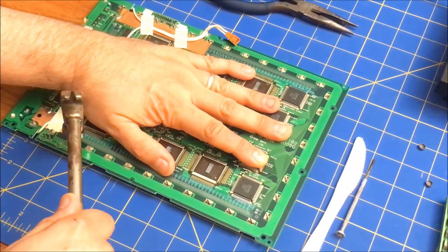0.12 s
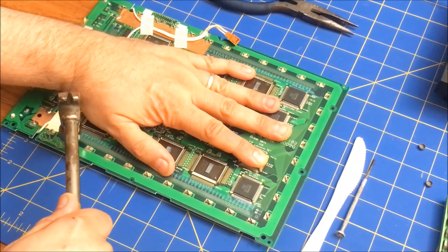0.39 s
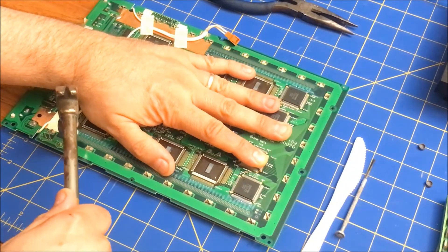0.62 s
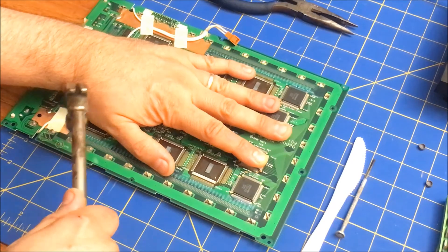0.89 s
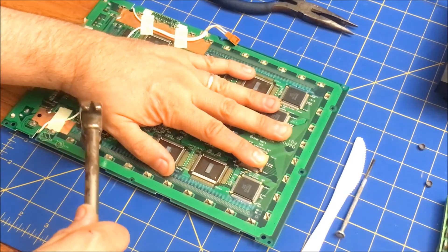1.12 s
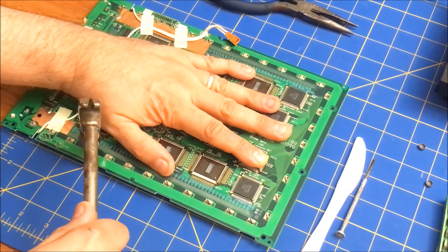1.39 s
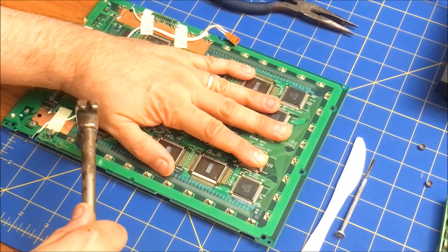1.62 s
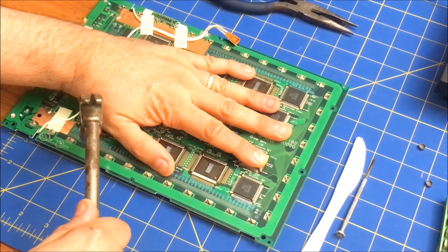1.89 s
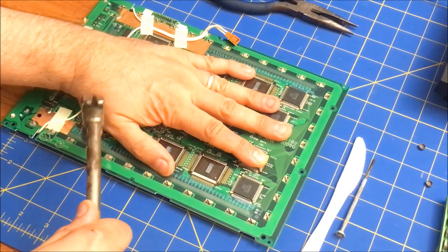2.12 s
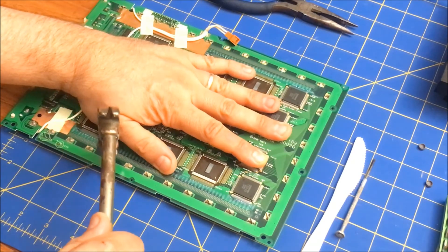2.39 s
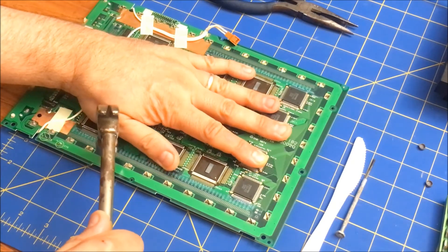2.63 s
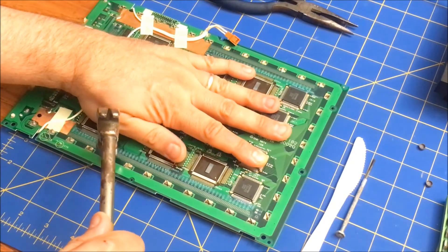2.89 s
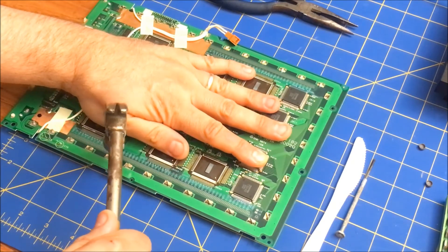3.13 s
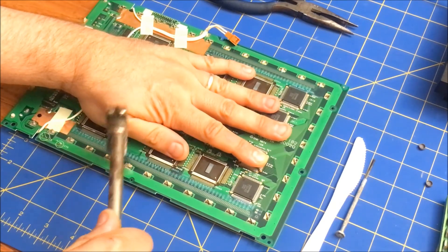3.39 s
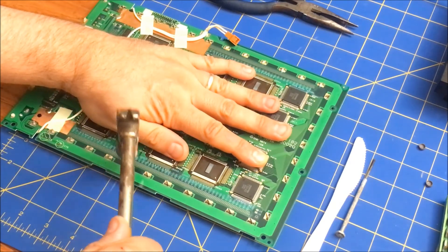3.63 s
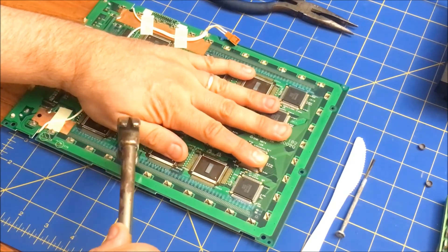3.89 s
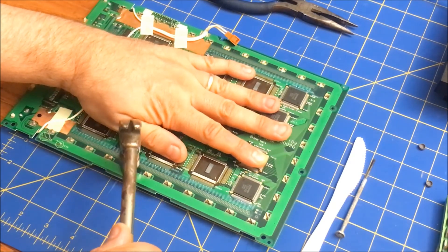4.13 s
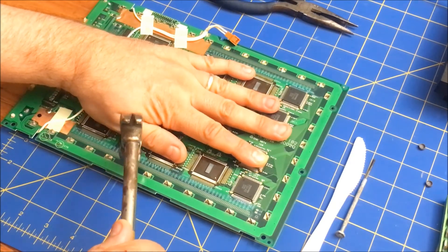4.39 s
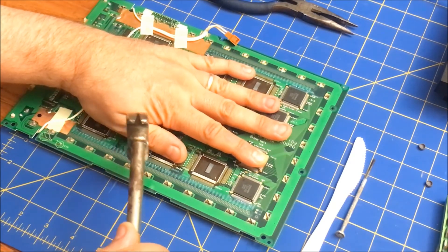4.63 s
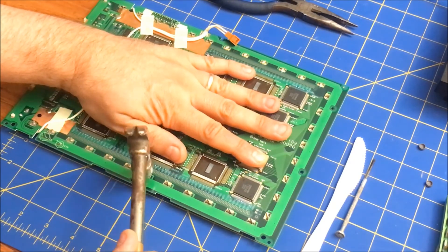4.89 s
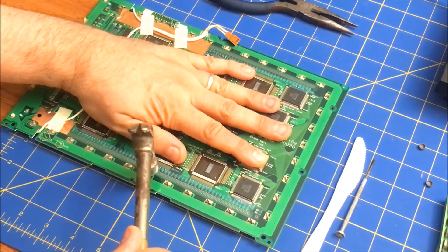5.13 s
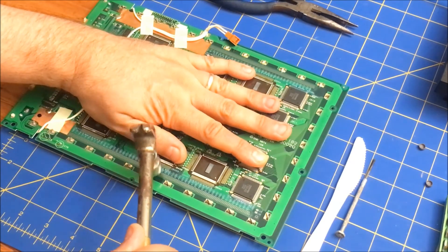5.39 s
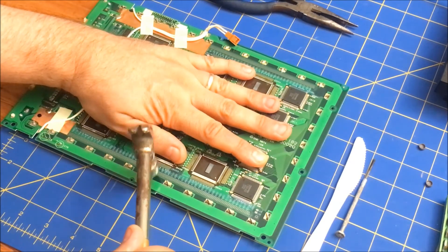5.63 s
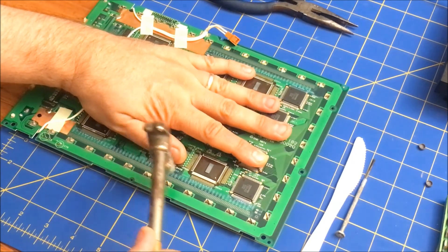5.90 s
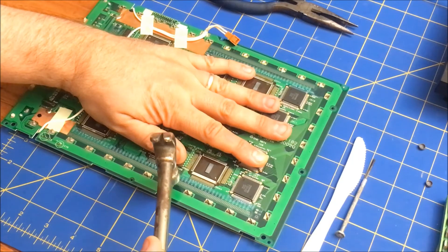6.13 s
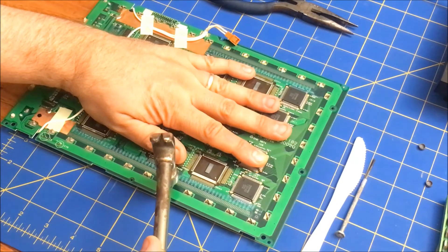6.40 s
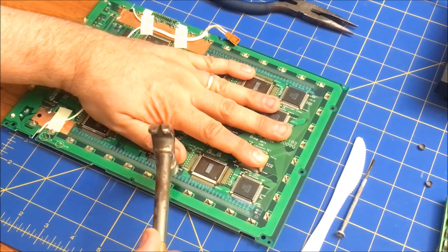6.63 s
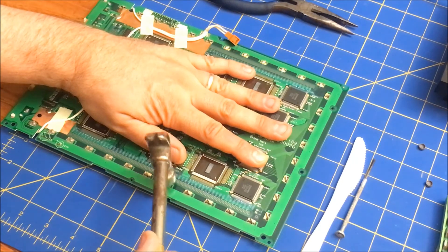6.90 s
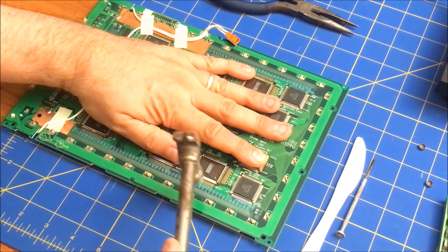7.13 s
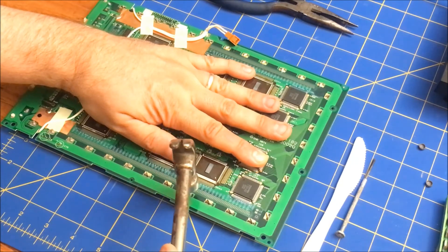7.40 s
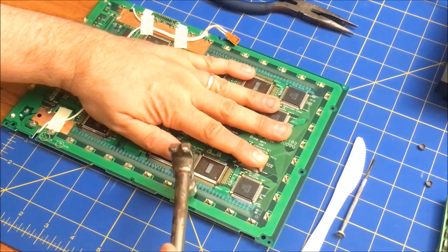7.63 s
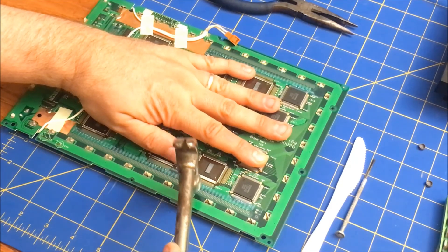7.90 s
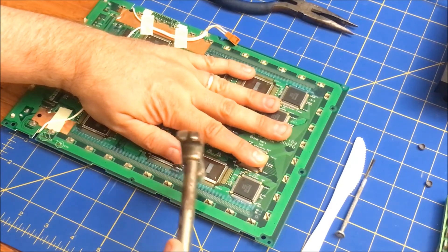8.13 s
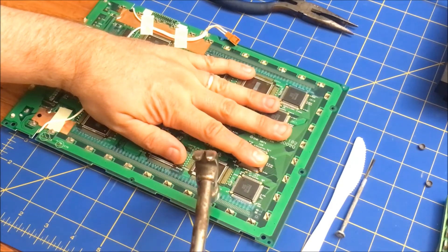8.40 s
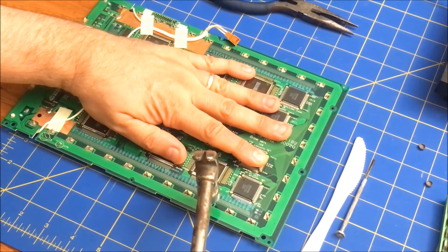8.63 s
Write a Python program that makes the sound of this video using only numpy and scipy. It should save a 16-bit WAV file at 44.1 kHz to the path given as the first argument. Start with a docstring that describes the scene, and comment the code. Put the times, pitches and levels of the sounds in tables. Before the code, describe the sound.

A tail of an earlier blow is already fading, then firm double taps repeat every second or so until just after eight seconds. Metal ticks on a stiff board, the bench thuds beneath, and some hits rattle or bounce. The microphone is close and the hardest peaks distort slightly. The small room rings briefly; faint birdlike whistles surface in the quiet gaps.

```python
"""Tapping tabs on a circuit board

On a workbench in a small room, a small steel tool taps metal tabs on a board held down by hand,
two blows at a time, often with a rebound. A blow is a bright tick of steel, a short crack of the board
and a low knock of the bench, each a set of dying sines; nearby surfaces and noise-built room tails answer.
Behind lie shaped noise (rumble and hiss), hiss that starts after some blows, and far whistling made of
blurred gliding tones, probably a bird. The hardest peaks overload the microphone input."""
import sys
import numpy as np
from scipy import signal
from scipy.fft import rfft, irfft
from scipy.io import wavfile
from scipy.ndimage import uniform_filter1d

SR = 44100
rng = np.random.default_rng(int(sys.argv[2]) if len(sys.argv) > 2 else 0)


def magnitude_from_level(level_db):
    """Linear magnitude for a level in decibels (20 dB per decade)."""
    exponent = np.asarray(level_db, float) / 20
    return 10 ** exponent


def wrap_up_sound(samples):
    """Save the sound to the file named by the first command line argument, as 16-bit audio."""
    columns = np.atleast_2d(samples).T
    # keep every value between -1 and 1, then stretch to whole-number steps
    tamed = np.clip(columns, -1, 1)
    steps = np.round(tamed * 32767).astype(np.int16)
    wavfile.write(sys.argv[1], SR, steps)


N = 386316  # length in samples
LEAD = SR // 2  # samples of run-up, for a blow already ringing out at the start


def evened(x):
    """Scales to rms 1."""
    return x / np.sqrt(np.mean(x ** 2) + 1e-20)


def read(points, hz):
    """Reads a table along log frequency."""
    table_hz, value = np.transpose(points)
    return np.interp(np.log(hz + 1), np.log(table_hz + 1), value)


def add(mix, at, sound):
    """Mixes a sound in from sample at, cut off at the end of the mix."""
    part = mix[at:at + len(sound)]
    part += sound[:len(part)]


def ring(modes, seconds):
    """Dying sines, one per mode; neighbouring modes start in opposite directions."""
    t = np.arange(round(seconds * SR)) / SR
    return sum((-1) ** k * magnitude_from_level(db - 60 * t / t60) * np.sin(2 * np.pi * hz * t)
               for k, (hz, db, t60) in enumerate(modes))


def coloured_noise(spectrum):
    """Steady noise of rms 1 with the given spectrum."""
    hz = np.fft.rfftfreq(N, 1 / SR)
    shaped = rfft(rng.standard_normal(N)) * magnitude_from_level(read(spectrum, hz))
    return evened(irfft(shaped, N))


# steady background at the microphone, relative spectrum: (pitch_hz, level_db)
FLOOR_SPECTRUM = [(15, -20), (25, -4), (97, 5.5), (373, -10), (427, -10), (545, -14.5), (624, -19.5),
                  (988, -22.5), (1070, -22.5), (1160, -23.5), (2050, -21), (2840, -26), (5280, -25),
                  (16000, -20.5)]


def floor():
    """Faint rumble and hiss: steady noise, strongest near 100 Hz."""
    return magnitude_from_level(-67.5) * coloured_noise(FLOOR_SPECTRUM)


# far whistled notes: (start_s, length_s, first_pitch_hz, last_pitch_hz, level_db)
WHISTLED_NOTES = [(.25, .07, 2810, 3150, -77), (0.301, 0.1, 3180, 3160, -68.5),
                  (0.378, 0.25, 2470, 2350, -77.5), (2.469, .11, 3480, 3450, -87),
                  (2.53, .08, 2900, 2810, -73.5), (2.595, 0.081, 2270, 2150, -75),
                  (2.681, .12, 2370, 2280, -72.5), (2.99, 0.063, 3020, 2990, -75.5),
                  (3.022, 0.11, 3330, 3370, -75.5), (5.73, 0.075, 2850, 2810, -71),
                  (6.177, .1, 3010, 3010, -76), (6.186, 0.092, 3390, 3400, -81),
                  (6.25, 0.08, 2300, 2650, -81), (6.335, 0.084, 2820, 2750, -71.5),
                  (6.355, 0.046, 3100, 3100, -77), (8.65, 0.068, 3057, 3056, -80.5),
                  (8.686, 0.06, 2460, 2430, -78.5)]


def whistles():
    """Gliding notes blurred by distance: a tone with wandering strength and an echoing end."""
    width_hz, rise_s, t60_s = 140, 0.006, 0.16
    out, t = np.zeros(N), np.arange(SR // 2) / SR
    keep = np.exp(-np.pi * width_hz / SR)
    two_poles = np.convolve([1, -keep], [1, -keep])
    draws = rng.standard_normal((len(WHISTLED_NOTES), 2, len(t)))
    for (start, length, first_hz, last_hz, db), noise in zip(WHISTLED_NOTES, draws):
        turns = np.cumsum(np.interp(t, [0, length], [first_hz, last_hz])) / SR
        blur = signal.lfilter([1], two_poles, noise[0] + 1j * noise[1])
        tone = evened((blur * np.exp(2j * np.pi * turns)).real)
        level = np.minimum(t / rise_s, 1) * magnitude_from_level(db - 60 * np.maximum(t - length, 0) / t60_s)
        add(out, round(start * SR), level * tone)
    return out


# hiss that stands up after some blows: (start_s, level_db)
SWELLS = [(-.22, -47.5), (0.929, -46.5), (4.643, -50.5)]
# its relative spectrum: (pitch_hz, level_db)
SWELL_SPECTRUM = [(590, -20), (1000, -6.5), (1230, -1.5), (1520, -12), (3930, -6), (4680, -12.5),
                  (10200, -7.5), (16000, -11)]


def hiss_swells():
    """Wide noise that starts at once, sinks slowly, drops quickly and then stays on very faintly."""
    hold_s, drop_s = 0.395, 0.035
    sink_db, drop_db = -13.5, -27
    t, level = np.arange(N) / SR, np.zeros(N)
    for start, db in SWELLS:
        shape_db = np.interp(t - start, [0, hold_s, hold_s + drop_s], [0, sink_db, sink_db + drop_db])
        level += (t >= start) * magnitude_from_level(db + shape_db)
    return level * coloured_noise(SWELL_SPECTRUM)


# decay of the small room: (pitch_hz, t60_s)
ROOM_DECAY = [(45, 1), (100, 0.98), (180, 0.92), (300, 0.71), (700, .35), (1200, 0.41), (2000, 0.36),
              (5000, 0.37), (13500, 0.2)]
# relative colour of its tail: (pitch_hz, level_db)
ROOM_TONE = [(30, -20.5), (60, 0.5), (100, -2), (200, -4), (400, -4.5), (700, 4.5), (950, -1), (1200, 6.5),
             (1500, 3), (1850, -1), (2600, -5), (3300, -5), (3700, -3), (4200, -7), (5000, -8), (9000, -9),
             (16000, -12)]


def room(x):
    """Three dense noise tails, each band dying at its own speed, that trade places as time passes."""
    hz, t, z = signal.stft(rng.standard_normal((3, SR)), SR, nperseg=1024, noverlap=768)
    patches = uniform_filter1d(rng.standard_normal(z.shape), 9, 1)
    patches = evened(uniform_filter1d(patches, 4, 2))  # uneven walls
    decay_db = 60 * t / read(ROOM_DECAY, hz)[:, None]
    z *= magnitude_from_level(read(ROOM_TONE, hz)[:, None] - decay_db + 0.72 * patches)
    tails = signal.istft(z, SR, nperseg=1024, noverlap=768)[1]
    age = np.arange(tails.shape[1]) / SR
    tails *= np.clip(age / 0.004, 0, 1)  # the reflections build up
    tails *= 1 + 9.7 * np.exp(-age / 0.0016)  # the clutter on the bench scatters first and strongest
    tails /= np.sqrt((tails ** 2).sum() / 3)
    turn = 2 * np.pi * 0.3 * np.arange(len(x)) / SR  # 0.3 turns a second
    shares = np.sqrt(2 / 3) * np.cos(turn + 2 * np.pi / 3 * np.arange(3)[:, None])
    return signal.oaconvolve(x * shares, tails, axes=1)[:, :len(x)].sum(0)


# the nearest surfaces: (delay_s, level_db)
NEAR_SURFACES = [(.0068, -24), (0.013, -21.5), (0.019, -23.5)]


def echoes(x):
    """The nearest surfaces send delayed, weaker copies back."""
    return x + sum(magnitude_from_level(db) * np.roll(x, round(delay * SR)) for delay, db in NEAR_SURFACES)


# modes of the bench top, relative levels: (pitch_hz, level_db, t60_s)
BENCH_MODES = [(51.6, -24.5, 0.52), (66.5, -21.5, 0.19), (85.6, -23, 0.22), (107, -22, 0.72),
               (138.2, -31, 0.087), (140.7, -14, 0.19), (178.4, -26, 0.62), (226.8, -18.5, 0.14),
               (224, -27.5, 0.27), (242, -31, 0.15), (279.3, -13, 0.19), (356, -16, 0.11),
               (383.3, -17, .22), (414, -2, 0.026), (459, -23.5, 0.054), (532.4, -13.5, 0.18),
               (600.5, -11, 0.08), (693.3, -17.5, 0.29), (822, -27, 0.34)]
# drive of the upper modes, less and less as the tool works its way along the board: (time_s, level_db)
UPPER_DRIVE = [(0, 1), (4, -0.5), (6, -5), (8.701, -10)]


def bench(push):
    """The modes of the bench top ring after each push."""
    split_hz = 480
    upper = magnitude_from_level(np.interp((np.arange(len(push)) - LEAD) / SR, *np.transpose(UPPER_DRIVE)))
    low = ring([mode for mode in BENCH_MODES if mode[0] < split_hz], 1)
    high = ring([mode for mode in BENCH_MODES if mode[0] >= split_hz], 1)
    return (signal.oaconvolve(push, low) - signal.oaconvolve(push * upper, high))[:len(push)]


# modes of the board under the hand, relative levels: (pitch_hz, level_db, t60_s)
BOARD_MODES = [(1128, -19.5, 0.11), (1211, -18, 0.079), (1416, -4, 0.016), (1426, -18.5, 0.056),
               (1811, -0.5, 0.0078), (1693, -23, 0.09), (2350, -5.5, 0.0091), (3117, -5, 0.0083),
               (3746, -5, 0.0058), (4420, -12, 0.0044)]


def board_ring(spot_hz):
    """The board's short ring; the spot struck favours the modes near spot_hz, by 3.1 dB an octave."""
    ringing = ring([(hz, db - 3.1 * abs(np.log2(hz / spot_hz)), t60) for hz, db, t60 in BOARD_MODES], 0.14)
    return ringing / np.linalg.norm(ringing)


CLICK = np.array([1, 0, -1])  # the bare click of metal meeting metal
# modes of the tool and tab, levels against the click: (pitch_hz, level_db, t60_s)
STEEL_MODES = [(5860, -10.5, 0.0062), (6600, -22, 0.0014), (9700, -15.5, 0.0056), (13500, -18, 0.0087)]


def steel_ring():
    """The bare click and the very short ring of tool and tab."""
    ringing = ring(STEEL_MODES, 0.03)
    ringing[:3] += CLICK
    return ringing


def chatter(noise, fade_s):
    """The uneven force of a contact: a sharp first touch, then a few milliseconds of rattling."""
    force = noise ** 3 * np.exp(-np.arange(len(noise)) / (fade_s * SR))
    force[0] += 1.5
    return force / np.linalg.norm(force)


# every contact of the tool, rebounds included; the first is already ringing out at the start:
# (start_s, relative force_db, steel tick against force_db, pitch_hz favoured by the spot struck)
TOOL_CONTACTS = [(-.25, 6.5, -22, 1780), (0.598, 1.5, -19.5, 1895), (0.63, -10, -32, 2430),
                 (0.9199, 3, -19, 1903), (0.9573, -4, -24, 1450), (1.8399, 1, -11, 1831),
                 (1.8758, -6.5, -18, 1473), (2.1683, 0, -13.5, 1980), (2.1715, -7.5, -12.5, 4353),
                 (2.2012, -2, -22, 1470), (3.1077, 1.5, -16, 1898), (3.4733, 1, -14.5, 1866),
                 (3.4974, -8, -18.5, 1880), (4.2902, 1.5, -15.5, 1722), (4.6275, 3, -11.5, 1710),
                 (4.6751, -11, -16.5, 1774), (5.4892, -18, -8.5, 1800), (5.4919, -0.5, -20, 1885),
                 (5.831, 2.5, -14.5, 1783), (6.6489, -13, -16, 2006), (6.6513, -0.5, -14, 1500),
                 (7.01, 3, -16.5, 1650), (7.052, -7.5, -26, 1438), (7.7765, 1, -20.5, 2283),
                 (7.8027, -10, -25, 2420), (8.131, 3.5, -17.5, 2414), (8.1723, -9, -21, 1863)]


def blows():
    """Each contact rattles board and steel in its own way and pushes the bench through a soft mat."""
    sharp, push, bare = np.zeros((3, N + 2 * LEAD))
    shove = signal.windows.hann(round(0.0012 * SR))  # the mat softens what reaches the bench
    steel = steel_ring()
    board_lag_s, bench_lag_s = 0.0005, 0.00054  # both answer a moment after the tick
    draws = rng.standard_normal((len(TOOL_CONTACTS), 2, 400))
    for (s, force_db, bright_db, spot_hz), noise in zip(TOOL_CONTACTS, draws):
        at = LEAD + round(s * SR)
        tick_db = force_db + bright_db
        knock_db = 1.05 * force_db - 16  # the knock grows slightly faster than the force
        board = board_ring(spot_hz)
        crack = np.convolve(chatter(noise[0], 0.002), board)
        tick = np.convolve(chatter(noise[1], 0.0012), steel)
        add(sharp, at + round(board_lag_s * SR), magnitude_from_level(force_db + 10.5) * crack / np.linalg.norm(crack))
        add(sharp, at, magnitude_from_level(tick_db + 22.0) * tick / np.linalg.norm(tick))
        add(push, at + round(bench_lag_s * SR), magnitude_from_level(knock_db) * shove / shove.sum())
        # the blow as the walls receive it: rattle smoothed away, the ring of the board kept
        bare[at + len(shove) // 2] += magnitude_from_level(force_db + 5.5)
        add(bare, at, magnitude_from_level(force_db - 0.5) * board)
        add(bare, at, magnitude_from_level(tick_db + 4.0) * CLICK)
    return sharp, magnitude_from_level(11.0) * bench(push), bare + magnitude_from_level(31.5) * push


def scene():
    """Blows on the bench, their room, and the background, on one channel."""
    sharp, knock, bare = blows()
    taps = echoes(sharp) + knock + room(bare)
    background = floor() + hiss_swells() + whistles()
    return (taps[LEAD:LEAD + N] + background)[None]


def band_limit(x):
    """A steep low-pass at the top of the band."""
    return signal.sosfilt(signal.butter(12, 16470, fs=SR, output="sos"), x)


def record(dry):
    """The microphone rounds off both ends, its input clips at full scale, then a steep 16 kHz low-pass."""
    microphone = signal.butter(2, [44.3, 15100], "band", fs=SR, output="sos")  # Hz
    heard = signal.sosfilt(microphone, dry)
    clipped = np.clip(heard, -1, 1)
    low_pass = signal.firwin(255, 16000, window=("kaiser", 6), fs=SR)
    mix = signal.oaconvolve(clipped, low_pass[None], "same")
    return band_limit(mix)


dry = scene()
out = record(dry)
wrap_up_sound(out)
```